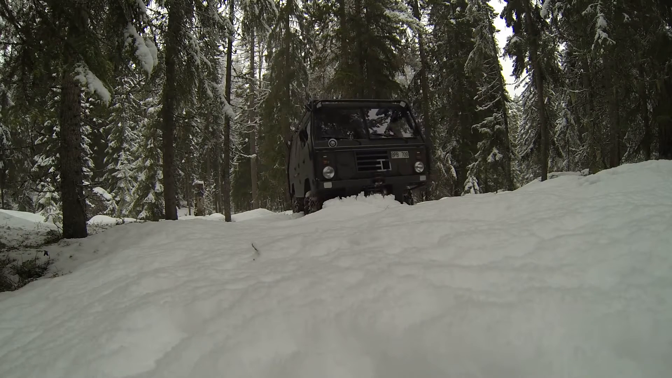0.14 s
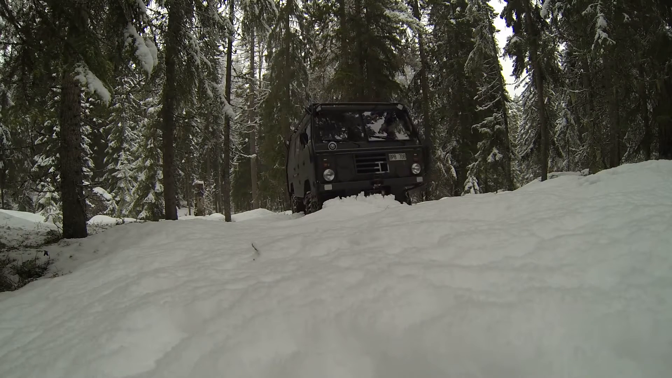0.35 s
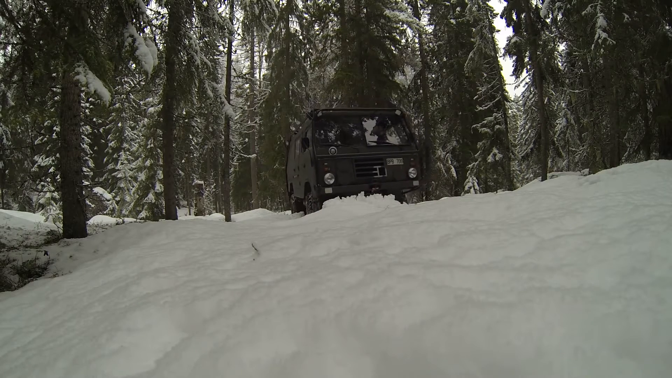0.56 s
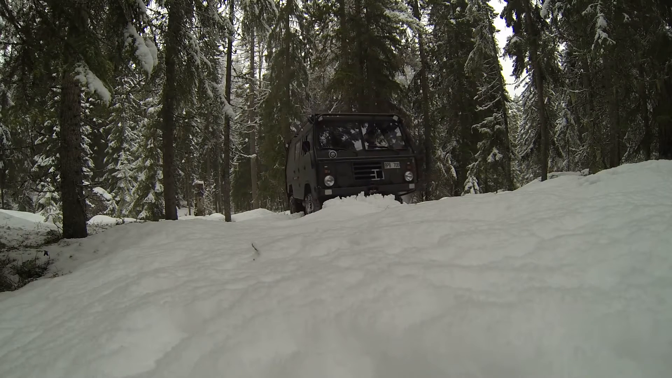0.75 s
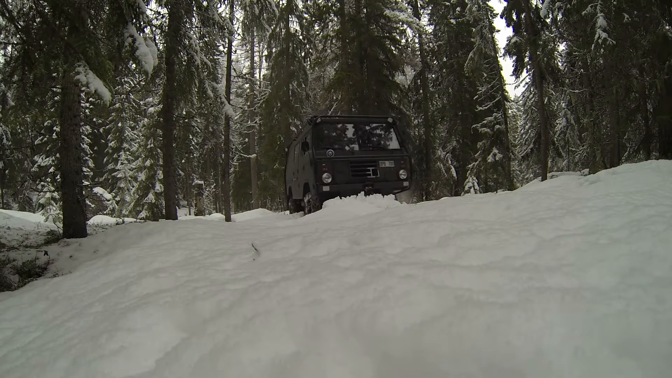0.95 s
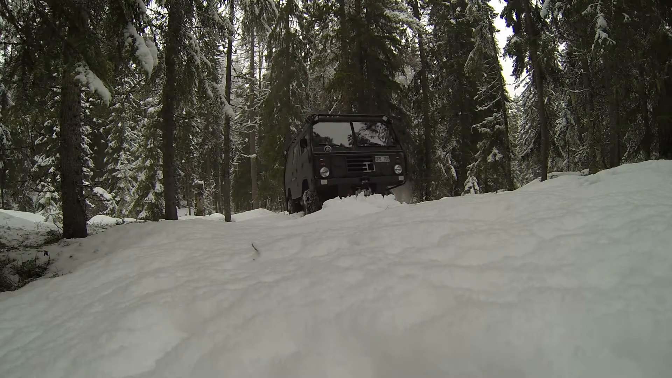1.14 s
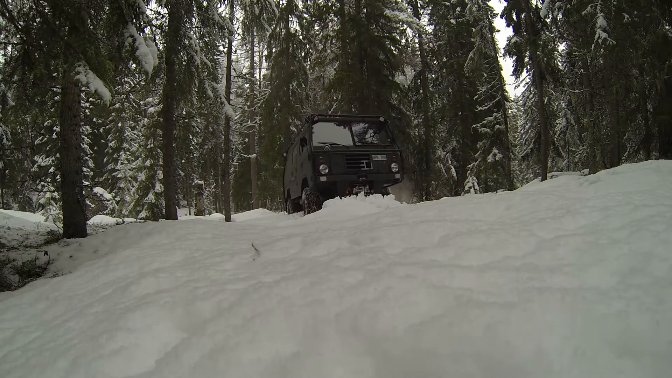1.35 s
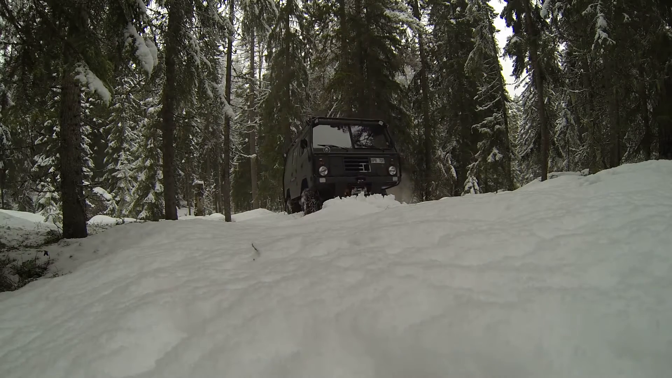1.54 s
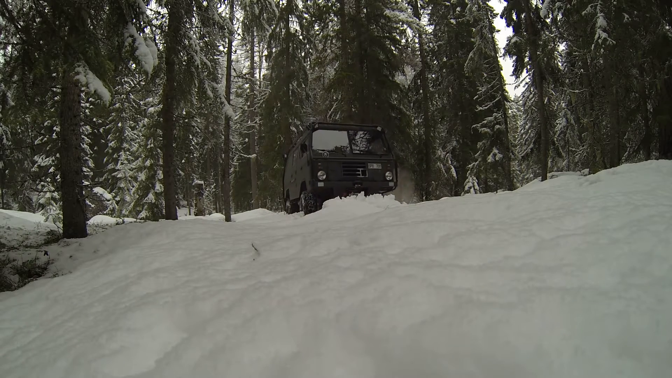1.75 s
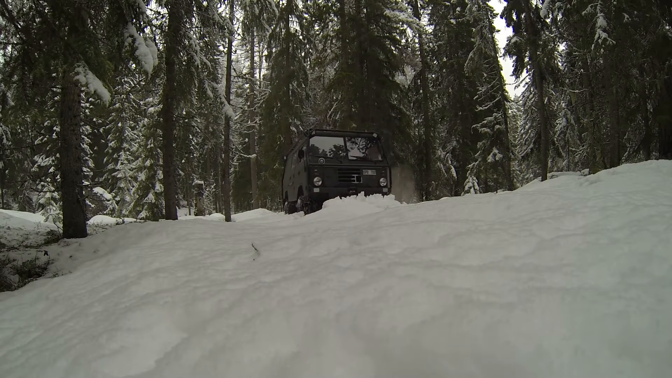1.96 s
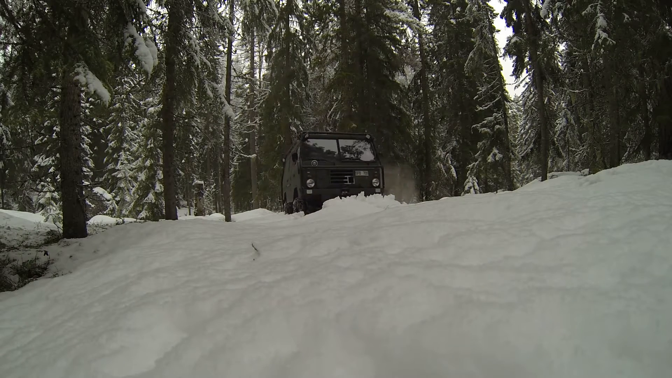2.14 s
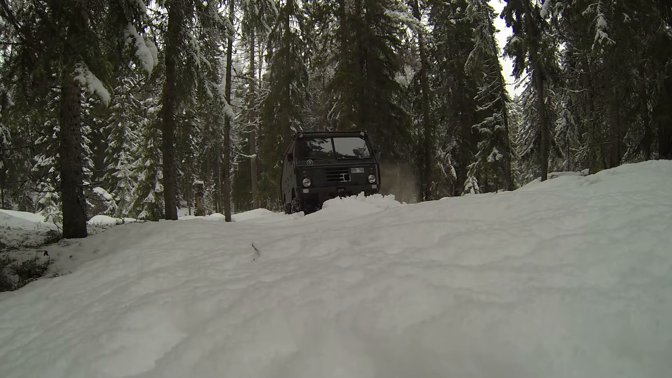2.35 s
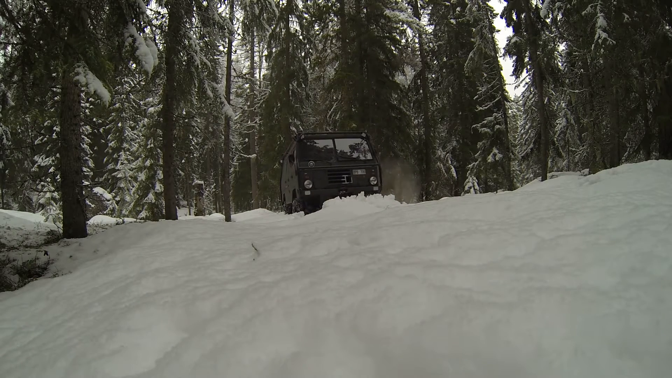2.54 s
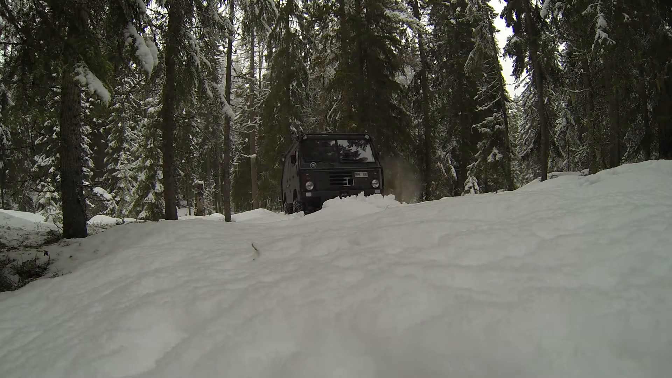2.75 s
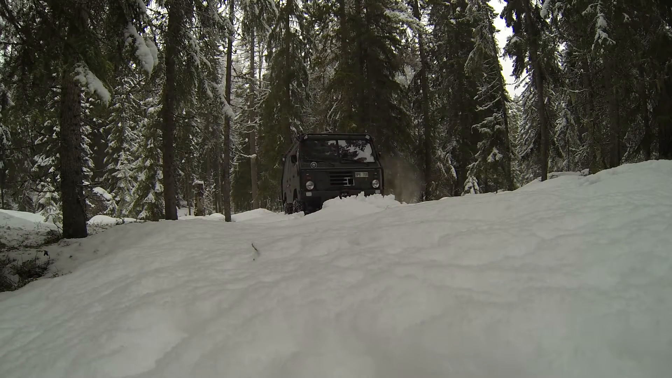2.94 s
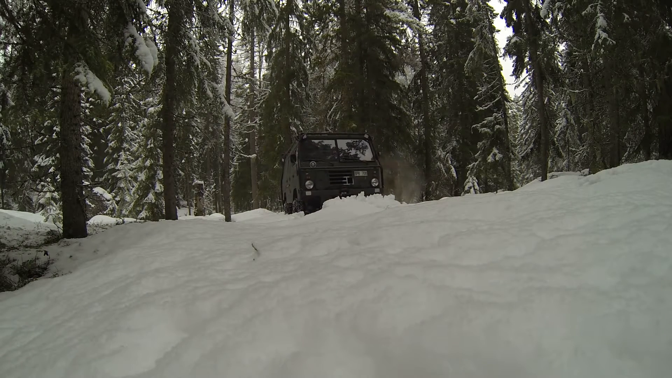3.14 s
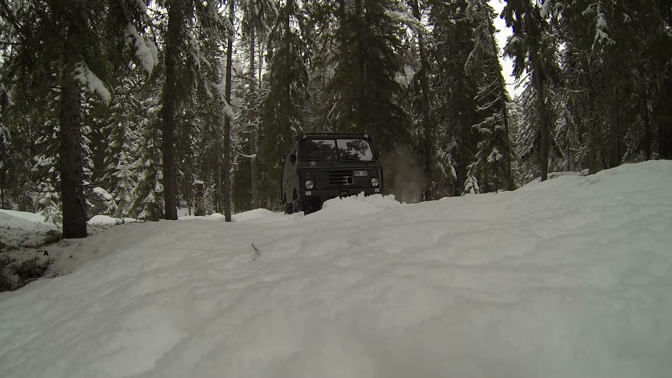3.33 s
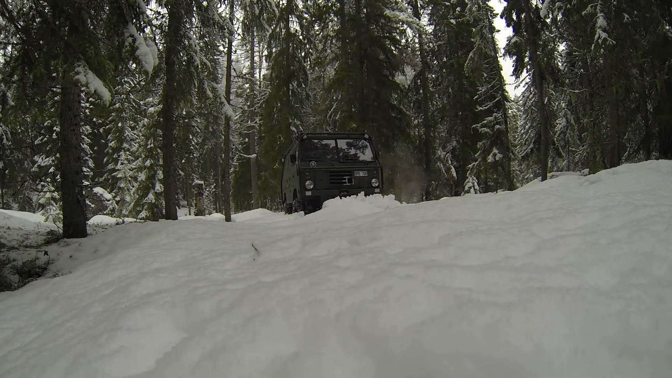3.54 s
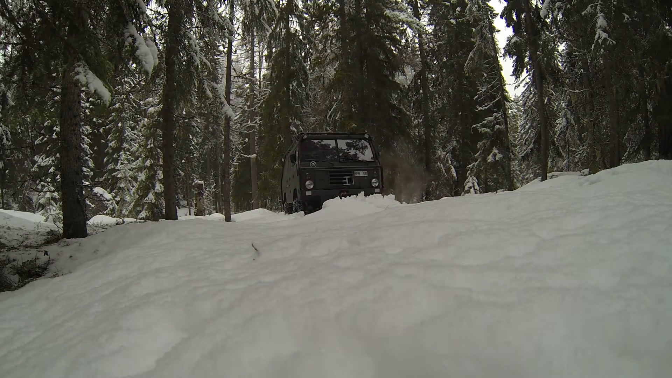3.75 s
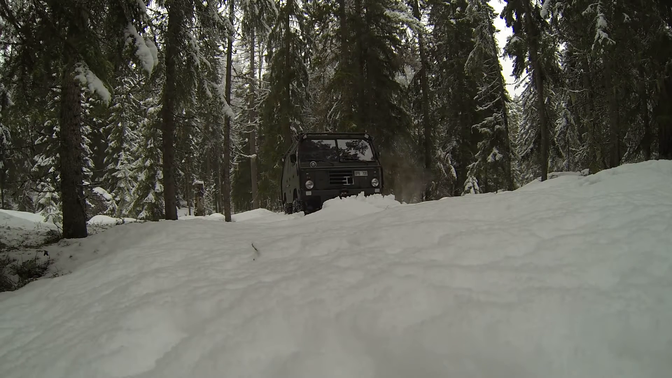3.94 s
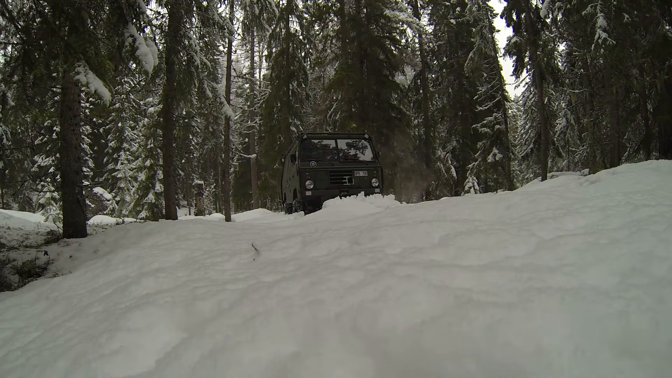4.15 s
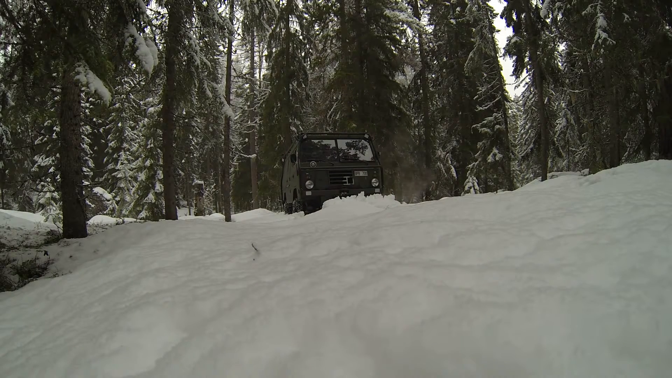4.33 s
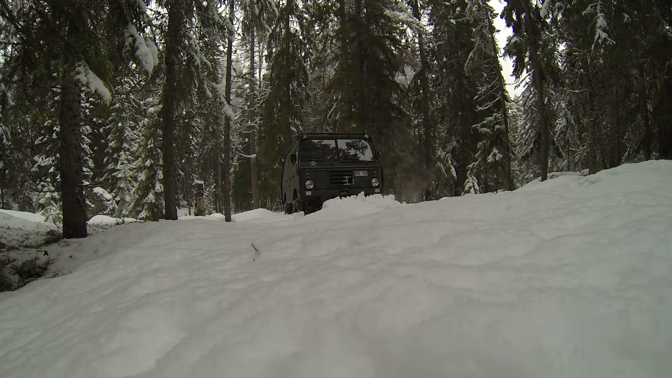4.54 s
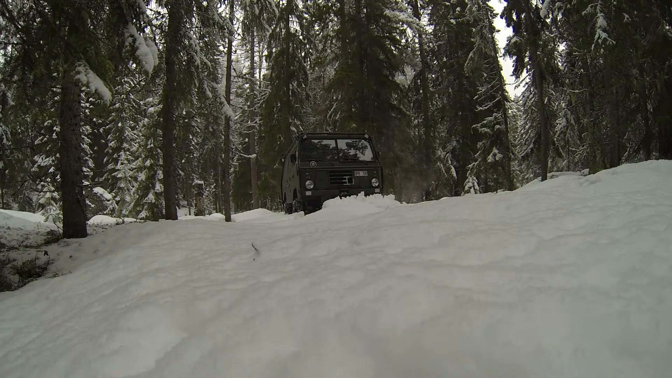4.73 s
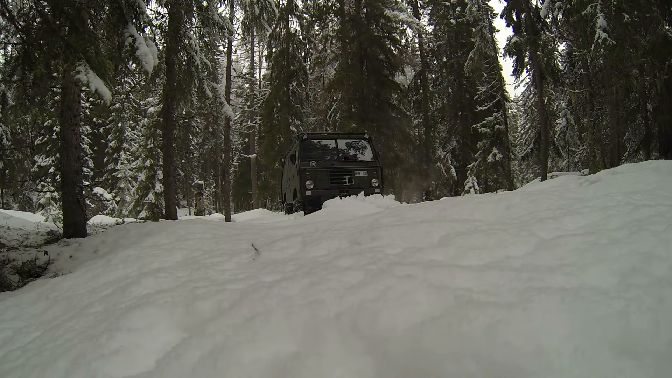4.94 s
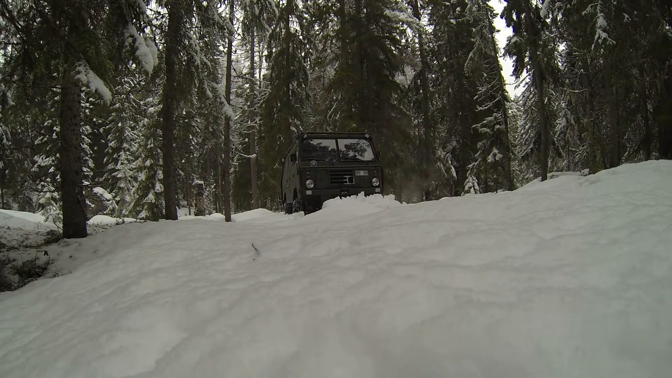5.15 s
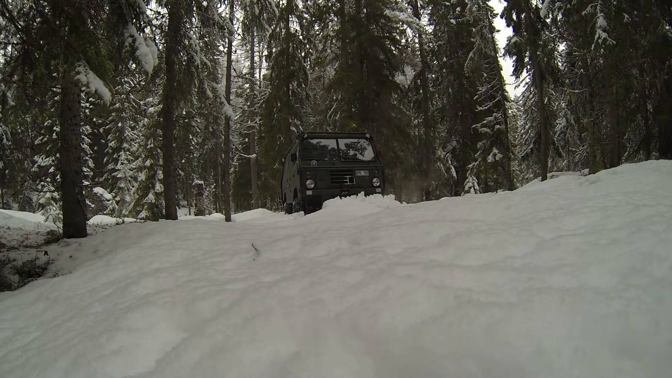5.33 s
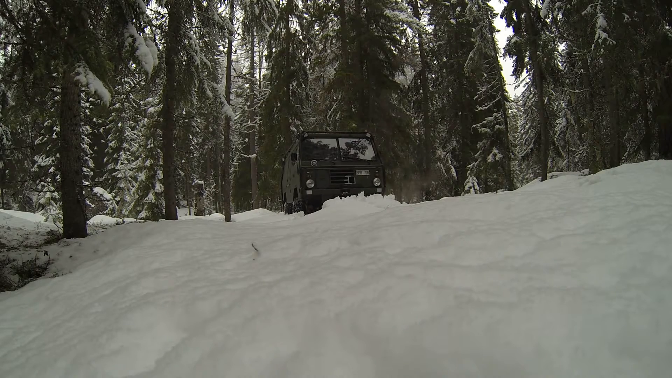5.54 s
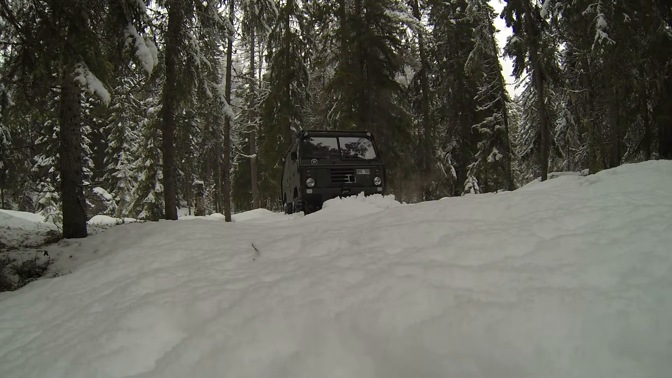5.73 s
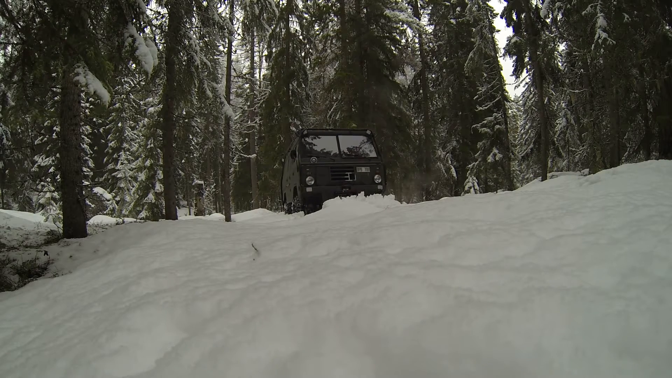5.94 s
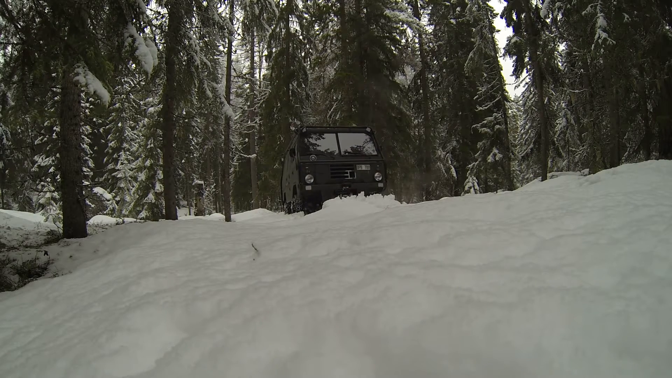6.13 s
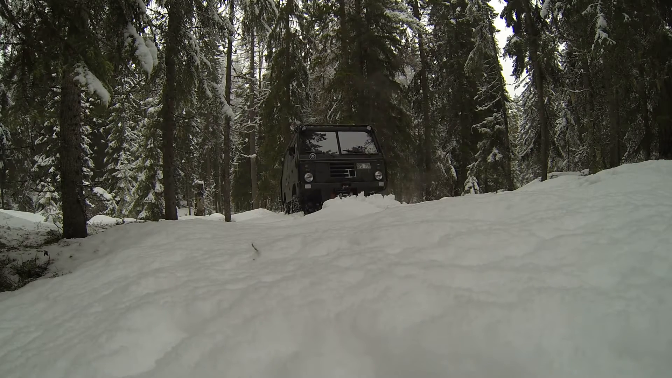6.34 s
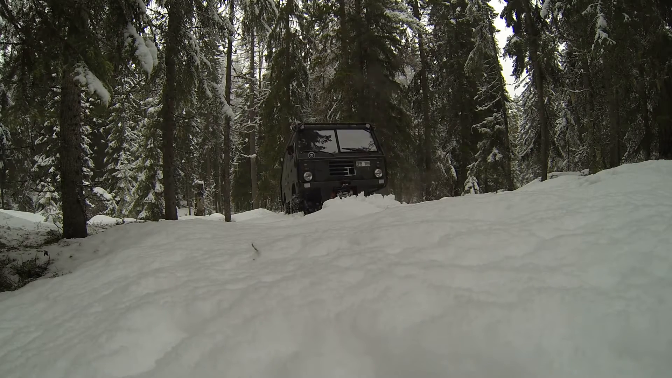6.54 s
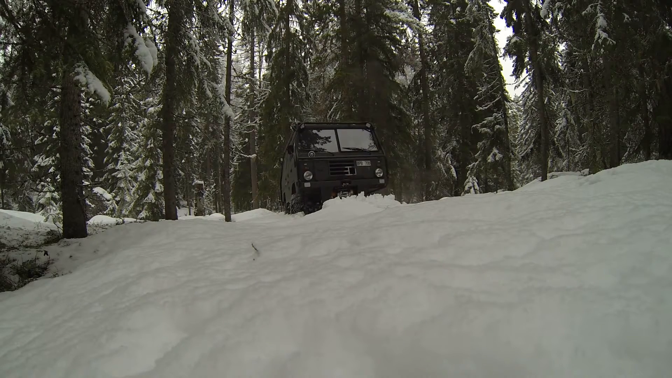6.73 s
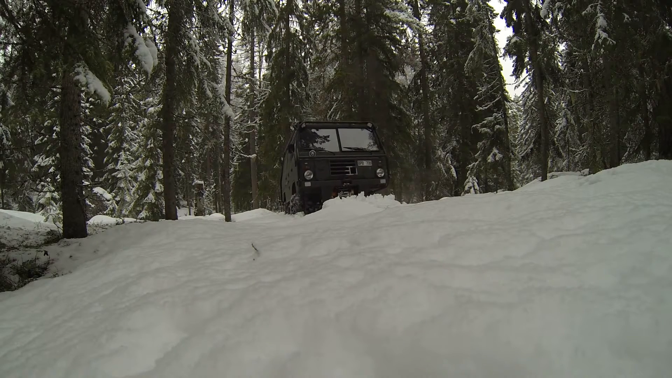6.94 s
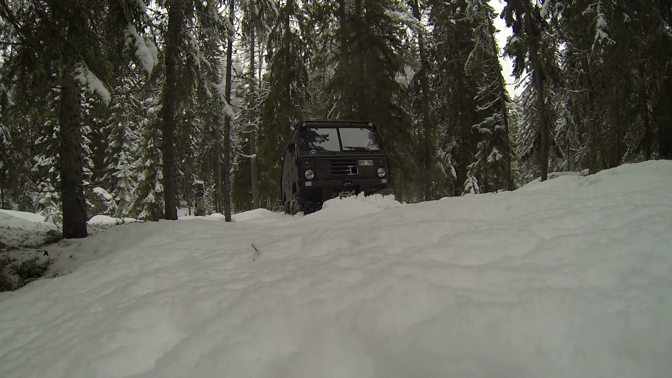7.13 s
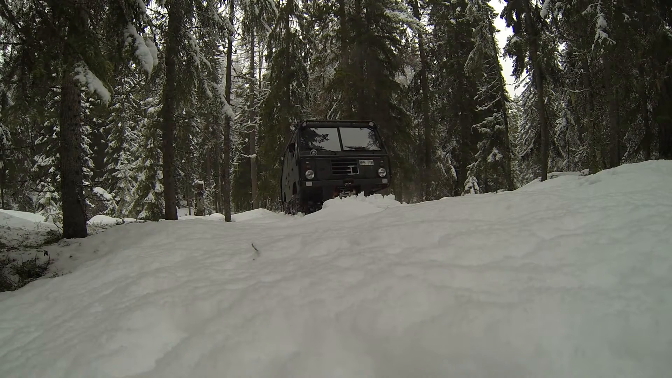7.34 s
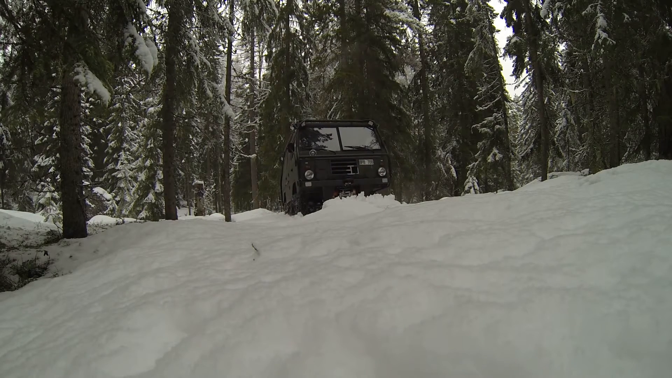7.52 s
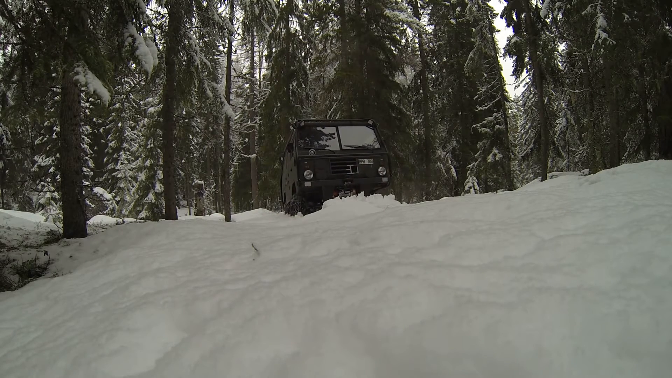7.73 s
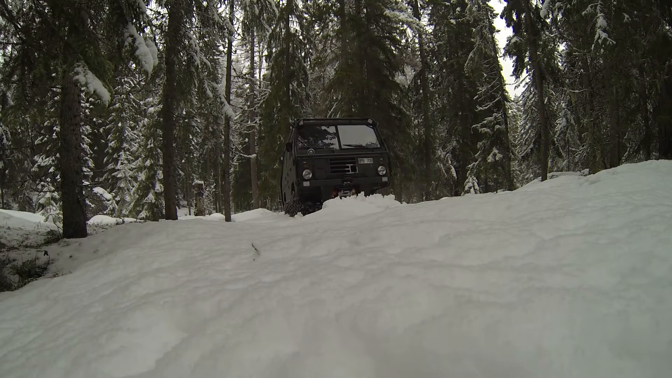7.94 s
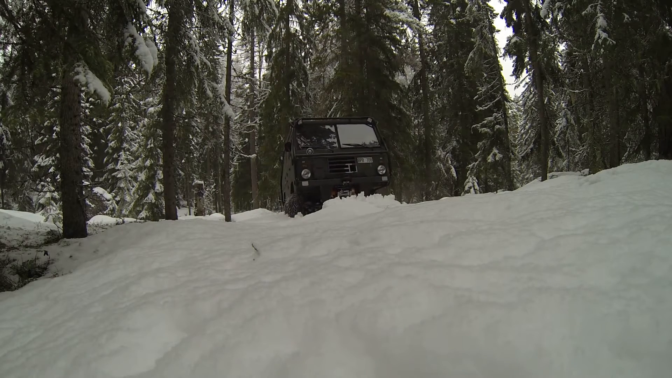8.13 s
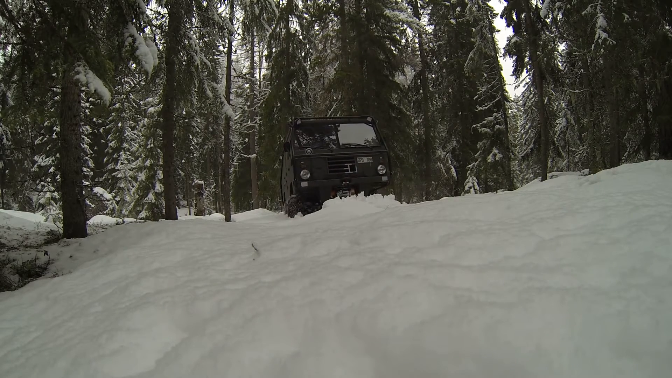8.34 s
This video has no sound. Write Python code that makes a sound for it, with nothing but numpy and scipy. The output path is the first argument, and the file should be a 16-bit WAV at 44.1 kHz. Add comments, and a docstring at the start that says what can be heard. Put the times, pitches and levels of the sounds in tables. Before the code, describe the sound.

Low, uneven truck engine in a snowy forest: one rev, a lumpy idle, a sudden dip, then a loaded climb with metallic knocks and snow crunch.

```python
"""A four-cylinder petrol off-road truck backs away through deep snow, idles, then pulls forward under load.
Its exhaust is a set of smooth harmonics plus uneven firing pulses; one engine phase drives all the engine layers.
Valve gear clatters as filtered noise; fan, belt drives and alternator sing at fixed multiples of the firing rate.
Tyres crush snow as tiny noise cracks and thin, high ticks; steel and body parts clank, knock and thud.
The forest adds a short soft echo, over a steady hiss and a faint high whine."""
import sys
import numpy as np
from scipy import signal
from scipy.fft import rfft, irfft
from scipy.io import wavfile
from scipy.ndimage import map_coordinates

SR = 44100
rng = np.random.default_rng(int(sys.argv[2]) if len(sys.argv) > 2 else 0)


def to_wav(s):
    """Save 16-bit WAV."""
    ch = np.atleast_2d(s).T  # columns
    pcm = np.round(np.clip(ch, -1, 1) * 32767)  # PCM
    wavfile.write(sys.argv[1], SR, pcm.astype(np.int16))


N = 373968
T = np.arange(N) / SR  # time of each sample, s

# Background: spectrum of the hiss (frequency [Hz], relative level per Hz [dB])
HISS_SPECTRUM = [(100, 22), (1000, 9), (5000, -1.5), (6500, -4), (7500, -4), (8500, -1), (9400, -9.5),
                 (10150, 0.5), (11000, -10), (12000, -6.5), (13000, -18), (15000, -34)]
# Faint high whine, levels before a common trim (frequency [Hz], rms level [dB])
WHINE_TONES = [(10600, -96.5), (10643, -76.5), (10691, -94), (13189, -89.5)]
TOP_HZ = 15600  # treble above this is cut

# Driving: a rev, idle, a near stall, then a long climb (time [s], firing rate [Hz])
ENGINE_SPEED = [(0.0, 38), (0.35, 53.3), (0.74, 69.3), (0.92, 64.5), (1.3, 48.9), (1.72, 41.2),
                (2.12, 40.8), (2.74, 43.6), (3.24, 40.5), (4.04, 44.4), (4.6, 43.2), (4.95, 42.4),
                (5.1, 31.5), (5.22, 29.5), (5.32, 33.5), (5.45, 43.5), (5.67, 49.2), (5.83, 46.5),
                (6.14, 36.8), (6.31, 47), (6.61, 52.8), (6.9, 53.8), (7.45, 61.8), (7.95, 65.8),
                (8.12, 65.7), (8.48, 70.3)]
# How hard the wheels work: backing, standing, pulling forward (time [s], load [0-1])
WHEEL_LOAD = [(0, 0.64), (1.25, 0.52), (1.82, 0.5), (2.15, 0.23), (3.2, 0.06), (4.2, 0.15), (5.2, 0.14),
              (5.7, 0.51), (6.05, 0.55), (6.3, 0.78), (6.65, 0.78), (6.77, 0.74), (6.84, 0.86),
              (7.27, 0.81), (8.48, 1)]
# Pedal: pressed, dropped, resting, pressed again to catch the stall (time [s], opening [0-1])
THROTTLE_OPENING = [(0, 0.85), (.35, 0.96), (.58, 0.87), (.8, 0.3), (1.15, 0.12), (1.4, 0.11), (2.3, 0.41),
                    (4.3, 0.27), (4.95, 0.07), (5.225, 0.45), (5.275, 0.94), (5.85, 0.89), (6.5, 1),
                    (8.48, 0.87)]
IDLE_HZ = 43  # firing rate at which the level laws start
CLUTCH_LOAD = .4  # the clutch grips fully from this load on
CLUTCH_UNEVEN_DB = 6.5  # with the clutch gripping, the wheels drag and the engine fires more unevenly
CLUTCH_SONG_DB = 10.5  # the gears then turn too and join the song

# Level laws: how each layer follows the driving, before its own clutch lift, trim or flutter
# (at idle speed [dB], per octave of speed [dB], added by full load [dB], added by full throttle [dB])
BOOM_LAW = (-40.5, 2.5, -1.5, 19.5)
OCTAVE_LAW = (-43, -5.5, 2.5, 5)
PIPE_LAW = (-73, 15.5, 10.5, 9.5)
UNEVEN_LAW = (-48.5, -4, 17.5, 1)
RUMBLE_LAW = (-60, 0, 18, -1.6)
CLATTER_LAW = (-66.5, 3, 17.5, -0.26)
CASING_LAW = (-68.5, 5, 14, -0.46)
TAPPET_LAW = (-71, 4, 5.5, 2)
SNOW_LAW = (-87.5, 0.5, 16, 6)
SONG_LAW = (-71.3, 21, -6.5, 0)
ALTERNATOR_LAW = (-72.3, 24, -1, 0)

# Colours of the noisy layers: engine rumble, valve clatter, ringing casing, tappets,
# crushed snow and scoured crust (frequency [Hz], relative level per Hz [dB])
RUMBLE_SPECTRUM = [(80, -10), (105, 7.5), (150, -3.5), (200, -1.5), (290, -4.5), (400, -6.5), (600, -15.5),
                   (1200, -43)]
CLATTER_SPECTRUM = [(200, -35), (330, -11), (440, -7), (540, -3.5), (660, -0.5), (780, -0.5), (860, 2),
                    (1000, -2), (1300, -9.5), (1700, -10.5), (3000, -38)]
CASING_SPECTRUM = [(900, -28), (1350, -10), (1720, 0.5), (2050, -1.5), (2350, -10.5), (2700, -43),
                   (4000, -36)]
TAPPET_SPECTRUM = [(2400, -8.5), (2700, -6.5), (2950, 2), (3250, -2.5), (3700, -8.5), (4300, -21.5),
                   (4900, -17.5), (6000, -34.5), (9000, -26)]
CRUNCH_SPECTRUM = [(2000, -4), (3800, 3.5), (5000, 3.5), (6000, -8), (7200, -12.5), (8400, 2),
                   (9400, -10.5), (12000, -10), (15000, -25)]
SCOUR_SPECTRUM = [(900, -5), (1300, -3), (1720, 2), (1950, -6), (2300, -12), (4000, -34)]
# A tyre scours the crust at the top of the first rev: loudest moment, level there, rise and fall
SPIN_S, SPIN_DB, SPIN_DB_PER_S = 0.77, -52, 25.5

# Steel clanks (time [s], level [dB], brightness tilt [dB per octave], ring length factor)
CLANK_EVENTS = [(.041, -47, -7, .9), (.735, -53, -4, .5), (.765, -52, -4, .5), (2.262, -57, 1, .7),
                (2.286, -56, -3, .9), (2.308, -57.5, -2, .9), (2.328, -56, 0, .7), (2.345, -54.5, 3, .45),
                (2.431, -48, 0, 1), (3.073, -57.5, 5, .7), (7.388, -51, 4, .45), (7.674, -50, 3, .3),
                (7.732, -49, 3, .3), (7.873, -40.5, 0, .45), (7.917, -49.5, 3, .35), (7.952, -48, 1, .35),
                (8.12, -50.5, 4, .4)]
# Body knocks (time [s], level [dB], brightness tilt [dB per octave], ring length factor)
KNOCK_EVENTS = [(1.94, -52, -4, .54), (2.705, -52.5, -2.5, .7), (3.47, -58, -3, .41),
                (3.499, -50.5, -1, .68), (4.064, -41.8, -.5, .75), (4.284, -53, -1, .5),
                (6.808, -44.5, -1, .7), (6.86, -48.5, 3, .55), (6.893, -45.5, 1, .7), (7, -48, 0, .5),
                (7.19, -46, 0, .6), (7.283, -46, 0, .5), (7.378, -40.5, 1, .6), (7.495, -47, 1, .6)]
# Ringing tones of steel, then of body panels (frequency [Hz], relative level [dB], time to fall 60 dB [s])
STEEL_MODES = [(877, -5, .11), (1720, -6, .06), (1900, -2, .05), (2000, 2, .085), (2930, -7, .08),
               (3138, -6, .08), (3311, -4, .06), (3980, -13, .06), (4447, -19, .11), (4753, -9.5, .1)]
PANEL_MODES = [(203, -9, .2), (471, -1.5, .15), (647, -5, .13), (800, -7, .07), (977, 2, .08),
               (1160, -2, .09), (1316, -2, .07), (1400, -1, .06), (1723, -2, .17), (3192, -4, .035)]
# Loose parts shaken by each kind of blow (frequency [Hz], relative level per Hz [dB])
STEEL_RATTLE_SPECTRUM = [(900, -26), (1500, 2), (2000, 11.5), (2550, -11), (3200, 0.5), (4200, -12.5),
                         (5000, -11), (6200, -27.5), (8400, -22), (10000, -34)]
PANEL_RATTLE_SPECTRUM = [(150, -3), (350, -1), (600, 2), (1000, -3), (1500, -10.5), (2000, -11),
                         (2500, -21), (3200, -17), (3800, -24), (4500, -38), (8000, -44)]
# A spring pings with the first clank (frequency [Hz], peak level [dB], time to fall 60 dB [s])
SPRING_MODES = [(3978, -66, .28), (4075, -61, .7), (4743, -60, .24)]
SPRING_S = .038
# Dull thuds as the chassis rocks (time of peak [s], level [dB], pitch [Hz])
THUD_EVENTS = [(1.37, -49, 200), (1.86, -52, 220), (2.84, -49, 120), (3.52, -56, 230), (4.08, -54, 160),
               (5.175, -51.5, 200), (5.76, -50, 180), (6.12, -49, 150), (6.825, -45.5, 280),
               (6.9, -48, 290), (7.255, -44, 220), (7.39, -46, 270), (7.555, -48, 250), (8.37, -40, 135)]
# Colour of a thud (multiple of its pitch, relative level per Hz [dB])
THUD_SPECTRUM = [(.45, -4), (.8, -3), (1, 2), (1.25, -5.5), (1.8, -27), (3, -36)]
# Thin, high ticks of crunching snow, mostly as the truck pulls
# (time [s], peak level before a common trim [dB], pitch [Hz])
TICK_EVENTS = [(1.191, -55, 11600), (6.506, -53, 14200), (6.777, -55, 12100), (7.098, -59, 12100),
               (7.128, -51, 11900), (7.161, -50, 12000), (7.187, -49, 12100), (7.286, -47, 12000),
               (7.304, -58, 12300), (7.347, -54, 12000), (7.637, -55, 12200), (7.919, -51, 14710),
               (8.415, -58, 11760)]

# Fan blades, pulleys and gears (multiple of the firing rate, relative level [dB])
DRIVE_TONES = [(3.12, -6), (4.68, -3), (5, -6), (6.25, 0), (7.9, -6), (8.2, -8), (9.4, -9), (12.8, -6),
               (14.4, -7)]
# Bonnet resonance that swells the drives (centre [Hz], width [Hz], lift [dB])
BONNET_RESONANCE = (425, 35, 4)
ALTERNATOR_RATIO = 10.88  # multiple of the firing rate; heard even at idle
# A gear sings briefly as the wheels roll on: loudest moment, pitch and level there, glide, swell, fade
GEAR_S, GEAR_HZ, GEAR_DB = 1.4, 422, -55
GEAR_RISE_HZ_PER_S, GEAR_SWELL_DB_PER_S, GEAR_FADE_DB_PER_S = 180, 110, 47
# Clatter that recurs each engine cycle, against its random part: grows with speed, breaks up under load
REGULAR_AT_IDLE, REGULAR_SPEED_POWER, REGULAR_LOAD_DB = .5, 1, -5

# Unbalanced pulley, before the surges and wavering (multiple of the firing rate, rms level [dB])
PULLEY_TONE = (1.16, -48.5)
# What the silencer lets through (frequency [Hz], level passed [dB])
SILENCER_CURVE = [(30, -1), (45, -0.5), (56, -1.5), (70, -3.5), (85, -1), (100, -5), (110, -17), (125, -11),
                  (140, -16)]
# The exhaust surges or misses for a few firings (middle time [s], change [dB], length [s])
LURCH_EVENTS = [(.785, -4, .04), (.845, -9, .04), (.945, 7, .05), (1.025, 4, .05), (1.062, -9, .025),
                (1.135, 4, .04), (1.18, -6, .03), (1.295, -9, .035), (1.39, 5.5, .07), (1.495, 6, .035),
                (1.685, -7, .03), (2.08, 5, .06), (2.15, -8, .04), (4.98, -7, .06), (6.5, 5, .04),
                (7.345, -8, .025), (7.405, 4.5, .035), (7.59, -6, .05)]
# The exhaust wavers, more with the throttle open: spread at half throttle, random changes per second
HUNT_DB, HUNT_PER_S = 1, 12


def undb(db):
    """Turn decibels into gain."""
    return 10 ** (np.asarray(db) / 20)


def curves(table):
    """Draw straight lines through each column of a table, one value per sample."""
    s, *columns = np.transpose(table)
    return [np.interp(T, s, c) for c in columns]


def driving():
    """Firing rate, load and throttle at every sample."""
    return curves(ENGINE_SPEED) + curves(WHEEL_LOAD) + curves(THROTTLE_OPENING)


def driven(law):
    """A layer's level in dB, from engine speed, load and throttle."""
    idle_db, speed_db, load_db, throttle_db = law
    hz, load, throttle = driving()
    return idle_db + speed_db * np.log2(hz / IDLE_HZ) + load_db * load + throttle_db * throttle


def unit(x):
    """Scale to an rms of 1."""
    return x / np.sqrt(np.mean(x ** 2))


def colour(x, points):
    """Filter by a spectrum of (Hz, dB) points, with sloping ends; rms 1."""
    hz, db = np.transpose(points)
    f = np.maximum(np.arange(len(x) // 2 + 1) * SR / len(x), 1)
    skirts = np.minimum(f / hz[0], 1) ** 2 * np.minimum(hz[-1] / f, 1) ** 2
    gain = undb(np.interp(np.log(f), np.log(hz), db))
    return unit(irfft(rfft(x) * skirts * gain, len(x)))


def walk(rate):
    """Smooth random drift with a spread near 1, heading for a new value `rate` times a second."""
    knots = rng.standard_normal(2048)
    return map_coordinates(knots, [T * rate], order=3, mode="wrap")


def add(out, s, sound):
    """Mix a sound in at time s."""
    i = int(s * SR)
    out[i:i + len(sound)] += sound[:N - i]


def forest(x, echo_db=-14.5, t60=0.5, shift_per_s=5):
    """Trunks scatter a soft tail that the snow soon swallows; the mix of its four paths keeps shifting."""
    t, echo, paths = T[:SR // 2], 0, []
    lowpass = signal.butter(1, 3000, fs=SR, output="sos")
    for _ in range(4):
        swell = np.minimum(t / 0.043, 1) ** 2
        tail = rng.standard_normal(len(t)) * undb(-60 * t / t60) * swell
        tail = signal.sosfilt(lowpass, tail)
        paths.append(walk(shift_per_s))
        echo = echo + paths[-1] * signal.oaconvolve(x, tail / np.linalg.norm(tail))[:N]
    return x + undb(echo_db) * echo / np.linalg.norm(paths, axis=0)  # the echo's overall level stays even


def ticks(length_s=0.005, width_hz=300, trim_db=-2, under_hz=8400, under_db=-9):
    """Very short, thin, rough ticks of crunching snow, each with a weaker ring at a second pitch below it."""
    out, t = np.zeros(N), T[:SR // 10]
    for s, db, hz in TICK_EVENTS:
        rough = np.interp(t * width_hz * 2, np.arange(256), rng.standard_normal(256))
        tone = np.sin(2 * np.pi * hz * t) + undb(under_db) * np.sin(2 * np.pi * under_hz * t)
        tick = rough * tone * t * np.exp(-t / length_s)
        add(out, s - length_s, undb(db + trim_db) * tick / np.abs(tick).max())
    return out


def spring():
    """A long, thin ring of sprung steel: a few fading sine tones."""
    t = np.maximum(T - SPRING_S, 0)  # silent until it starts
    return sum(undb(db - 60 * t / t60) * np.sin(2 * np.pi * hz * t) for hz, db, t60 in SPRING_MODES)


def blows(events, modes, rattle_spectrum, contact_s, rattle_db, rattle_s):
    """Each blow rings the metal's modes and shakes a short rattle out of the loose parts around."""
    out, t = np.zeros(N), T[:SR // 2]
    centre_hz = modes[len(modes) // 2][0]  # brightness tilts around this pitch
    for s, db, bright_db, length in events:
        ring = 0
        for hz, mode_db, t60 in modes:
            tilt_db = bright_db * np.log2(hz / centre_hz)
            fade = undb(mode_db + tilt_db - 60 * t / (t60 * length))
            detuned_hz = hz * (1 + .005 * rng.normal())
            ring = ring + fade * np.sin(2 * np.pi * (detuned_hz * t + rng.random()))
        tilted = [(hz, band_db + bright_db * np.log2(hz / centre_hz)) for hz, band_db in rattle_spectrum]
        loose = colour(rng.standard_normal(len(t)), tilted) * np.exp(-(t / rattle_s) ** 2)
        hit = (ring + undb(rattle_db) * loose) * (1 - np.exp(-t / contact_s))
        add(out, s, undb(db) * hit / hit[:SR // 50].std())  # level set over the first 20 ms
    return out


def thuds(rise_s=0.01373):
    """Dull bumps of the springs and chassis, each a quickly fading boom around its own pitch."""
    out, t = np.zeros(N), T[:SR // 4]
    for s, db, hz in THUD_EVENTS:
        spectrum = [(hz * ratio, band_db) for ratio, band_db in THUD_SPECTRUM]
        bump = colour(rng.standard_normal(len(t)), spectrum) * t * np.exp(-t / rise_s)
        add(out, s - rise_s, undb(db) * bump / bump[:SR // 20].std())  # level set over the first 50 ms
    return out


def wheelspin(grain_db=2.5):
    """A gritty roar that swells and dies as the tread slips over the crust."""
    grit = rng.standard_normal(N) * undb(grain_db * walk(90.4))
    return undb(SPIN_DB - SPIN_DB_PER_S * np.abs(T - SPIN_S)) * colour(grit, SCOUR_SPECTRUM)


def crunch(grain_db=6.4, patchy_db=3.2):
    """Snow crust breaks under the tyres in dense patches of tiny cracks."""
    sizes_db = grain_db * np.minimum(rng.exponential(1, N), 4.6)
    cracks = rng.standard_normal(N) * undb(sizes_db)
    return colour(cracks * undb(patchy_db * walk(27)), CRUNCH_SPECTRUM)


def gear():
    """A short rising whine from the transmission."""
    t = T - GEAR_S
    hz = GEAR_HZ + GEAR_RISE_HZ_PER_S * t
    db = GEAR_DB + np.minimum(GEAR_SWELL_DB_PER_S * t, -GEAR_FADE_DB_PER_S * t)
    turns = np.cumsum(hz * (1 + 0.0296 * walk(40))) / SR
    return undb(db + 2 * walk(30.2)) * np.sqrt(2) * np.sin(2 * np.pi * turns)


def alternator(phase, slip=.085, flutter_db=2.5):
    """A thin whine on the belt, slipping a little."""
    level = undb(driven(ALTERNATOR_LAW) + flutter_db * walk(10))
    turns = ALTERNATOR_RATIO * phase + slip * walk(12)
    return level * np.sqrt(2) * np.sin(2 * np.pi * turns)


def drives(phase, hz, slip, flutter_db):
    """Driven parts sing at fixed ratios of the engine speed, slip a little and swell near the bonnet's pitch."""
    centre_hz, width_hz, lift_db = BONNET_RESONANCE
    out = 0
    for ratio, db in DRIVE_TONES:
        lift = lift_db * np.exp(-((ratio * hz - centre_hz) / width_hz) ** 2)
        level = undb(db + lift + flutter_db * walk(14))
        out = out + level * np.sin(2 * np.pi * (ratio * phase + slip * walk(9)))
    return unit(out)


def machinery(phase, spectrum, repeat, pulsing, grain_db):
    """Impacts that partly recur every four firings, bunched around each firing, ring the engine's casing."""
    slots = 4096
    cycle = phase / 4 % 1
    pattern = rng.standard_normal(slots) * undb(2.2 * rng.standard_normal(slots))
    # Adding up the pattern and taking steps keeps every impact at any engine speed
    passed = np.interp(cycle * slots, np.arange(slots), np.cumsum(pattern - pattern.mean()))
    recurring = unit(np.diff(passed, prepend=passed[0]))
    gate = np.exp(pulsing * np.cos(2 * np.pi * phase)) * undb(grain_db * walk(110))
    return colour((repeat * recurring + rng.standard_normal(N)) * gate, spectrum)


def pulley(phase):
    """An unbalanced pulley hums just above the firing rate and beats with it, so the idle throbs."""
    ratio, db = PULLEY_TONE
    return undb(db) * np.sqrt(2) * np.sin(2 * np.pi * ratio * phase)


def lurches():
    """The exhaust's surges and gaps, in dB."""
    return sum(db * np.exp(-(2 * (T - s) / length) ** 2) for s, db, length in LURCH_EVENTS)


def stumble(phase, load, uneven_db, limp=0.39, trim_db=0.5):
    """Firings differ in strength and alternate under load; the silencer makes this a low, uneven throb."""
    firing = np.floor(phase + 3 / 4).astype(int)  # each pulse comes a quarter of a firing late
    strength = rng.uniform(-1.07, 1, 2048)[firing] + limp * load * (-1) ** firing
    pulses = np.diff(firing, prepend=firing[0]) * strength
    throb = [(12, -28.0), (24, 8.5), (36, 7.5), (52, 4.5), (70, -7.0), (105, -17.5), (140, -52)]
    return undb(uneven_db + trim_db) * colour(pulses, throb)


def silencer(hz):
    """What the silencer passes at a frequency, in dB."""
    points_hz, db = np.transpose(SILENCER_CURVE)
    return np.interp(np.log(hz), np.log(points_hz), db)


def exhaust(hz, phase, pipe_db, pipe_hz=203, pipe_width_hz=24, lope=0.064, scatter_db=0.86):
    """The silencer leaves three smooth harmonics; the third swells when it meets the pipe's resonance."""
    boom_db = driven(BOOM_LAW) + silencer(hz)
    octave_db = driven(OCTAVE_LAW) + silencer(2 * hz)
    turn = 2 * np.pi * phase
    # A little of half the firing rate gives the boom its lope
    boom = undb(boom_db + scatter_db * walk(30)) * (np.cos(turn) + lope * np.cos(turn / 2))
    octave = undb(octave_db + scatter_db / 2 * walk(15)) * np.cos(2 * turn)
    third = np.cos(3 * turn + 0.55 * walk(16))
    resonance = 1 / np.hypot(1, 2 * (3 * hz - pipe_hz) / pipe_width_hz)
    pipe = undb(pipe_db + 2.7 * walk(22)) * resonance
    return np.sqrt(2) * (boom + octave + pipe * third)


def scene():
    """One engine phase drives every engine layer; speed, load and throttle set their levels."""
    hz, load, throttle = driving()
    phase = np.cumsum(hz) / SR  # counts firings
    clutch = np.clip(load / CLUTCH_LOAD, 0, 1)
    speed_ratio = hz / IDLE_HZ
    regular = REGULAR_AT_IDLE * speed_ratio ** REGULAR_SPEED_POWER * undb(REGULAR_LOAD_DB * load ** 2)

    truck = undb(driven(SNOW_LAW)) * crunch() + wheelspin() + ticks()
    truck += blows(CLANK_EVENTS, STEEL_MODES, STEEL_RATTLE_SPECTRUM,
                   contact_s=.002, rattle_db=0, rattle_s=.018)
    truck += blows(KNOCK_EVENTS, PANEL_MODES, PANEL_RATTLE_SPECTRUM,
                   contact_s=.001, rattle_db=0, rattle_s=.018)
    truck += spring() + thuds()
    truck += alternator(phase) + gear()
    song_level = undb(driven(SONG_LAW) + CLUTCH_SONG_DB * clutch)
    truck += song_level * drives(phase, hz, slip=.065, flutter_db=2.0)
    for law, spectrum, repeat, pulsing, grain_db in [
            (RUMBLE_LAW, RUMBLE_SPECTRUM, regular / 2, 0.2, 3.0),
            (CLATTER_LAW, CLATTER_SPECTRUM, regular, 0.22, 2.5),
            (CASING_LAW, CASING_SPECTRUM, regular, 0.051, 2.0),
            (TAPPET_LAW, TAPPET_SPECTRUM, regular, 0.15, 1.5)]:
        truck += undb(driven(law)) * machinery(phase, spectrum, repeat, pulsing, grain_db)

    low = exhaust(hz, phase, driven(PIPE_LAW)) + pulley(phase)
    low += stumble(phase, load, driven(UNEVEN_LAW) + CLUTCH_UNEVEN_DB * clutch)
    waver_db = HUNT_DB * (0.5 + throttle) * walk(HUNT_PER_S)
    low *= undb(lurches() + waver_db) * np.minimum(T / 0.0078, 1)  # with a short fade-in
    return (forest(truck) + low)[None]  # the exhaust gets no echo


def record(dry):
    """Add a steady hiss and a faint, slightly wavering high whine, then cut the top of the treble."""
    hiss = undb(-64.0) * colour(rng.standard_normal(N), HISS_SPECTRUM)
    whine = 0
    for hz, db in WHINE_TONES:
        level = undb(db - 1.5 + 0.45 * walk(17))  # 1.5 dB is the common trim
        whine = whine + np.sqrt(2) * level * np.sin(2 * np.pi * hz * T)
    top_cut = signal.ellip(8, .2, 70, TOP_HZ, fs=SR, output="sos")
    return signal.sosfilt(top_cut, dry + hiss + whine)


dry = scene()
out = record(dry)
to_wav(out)
```